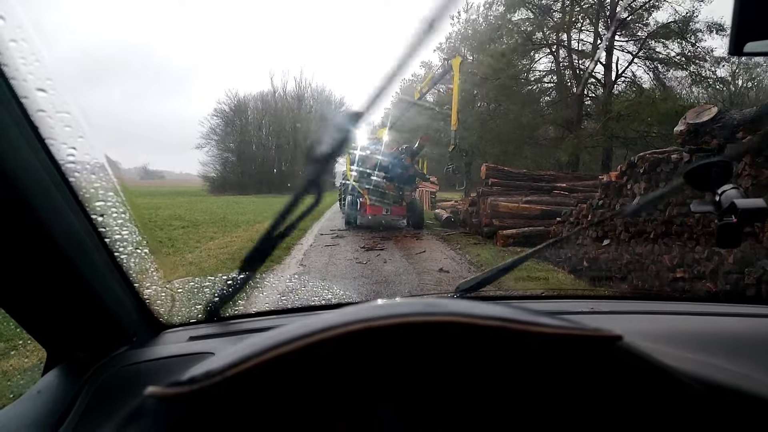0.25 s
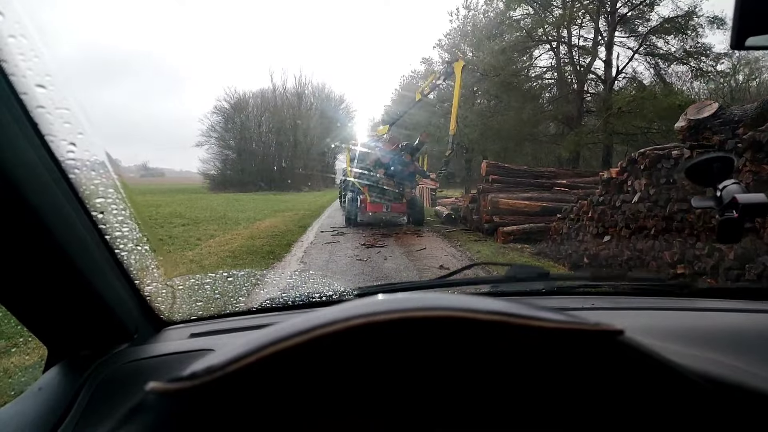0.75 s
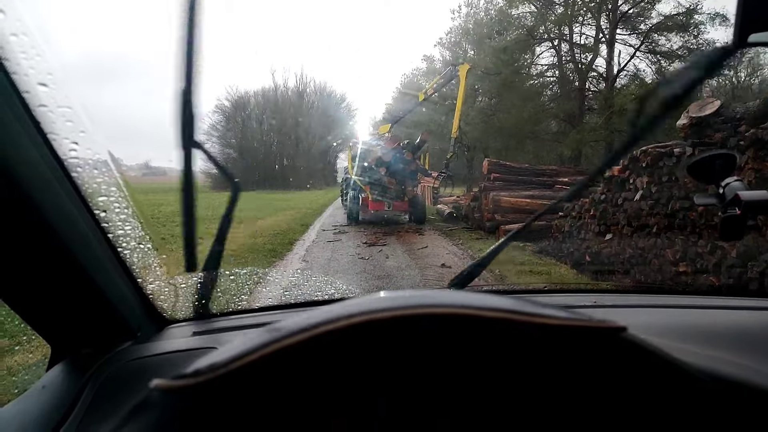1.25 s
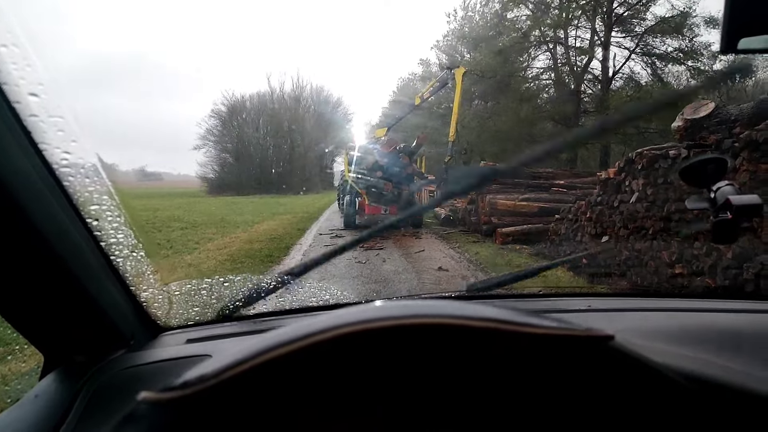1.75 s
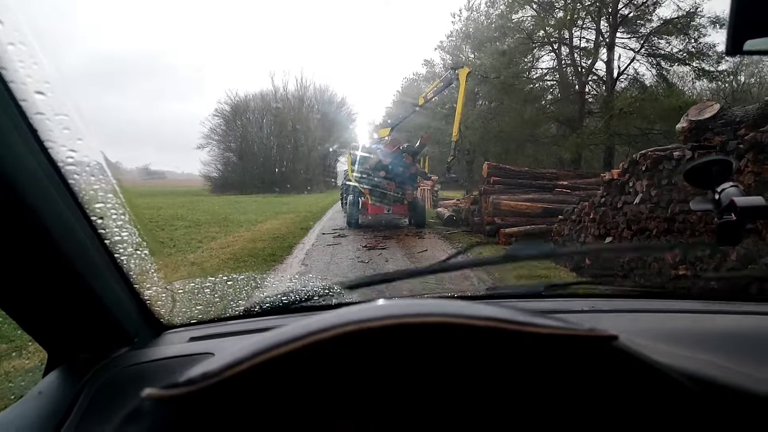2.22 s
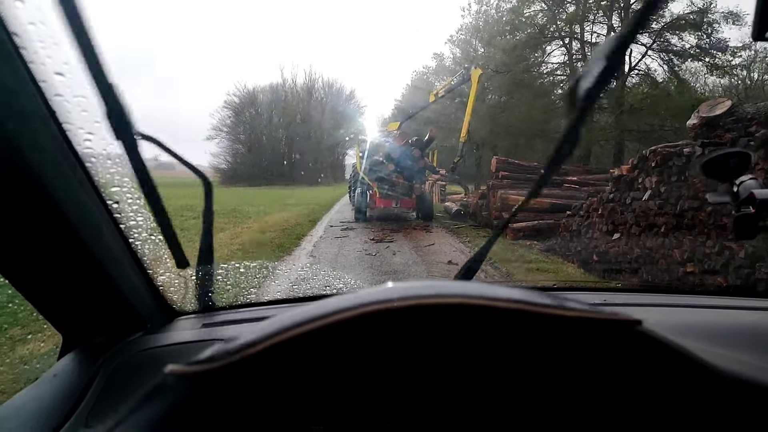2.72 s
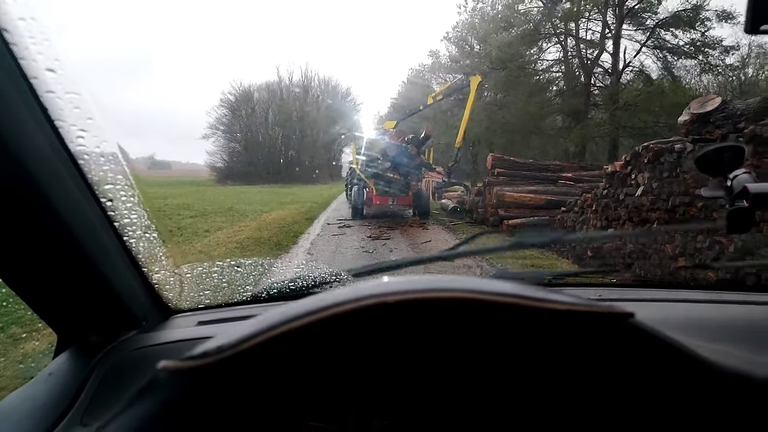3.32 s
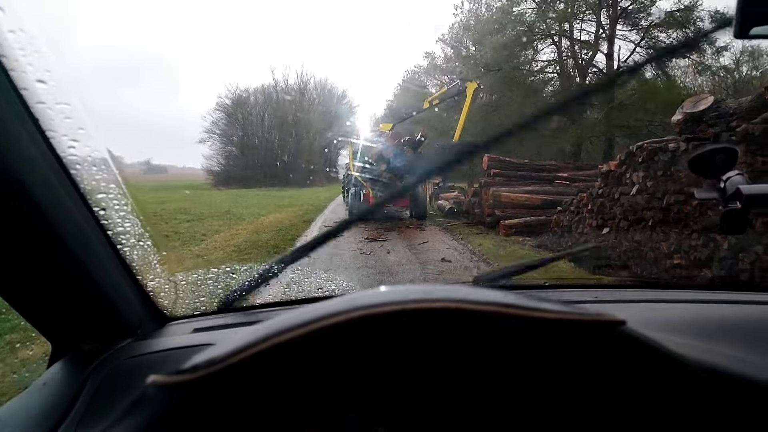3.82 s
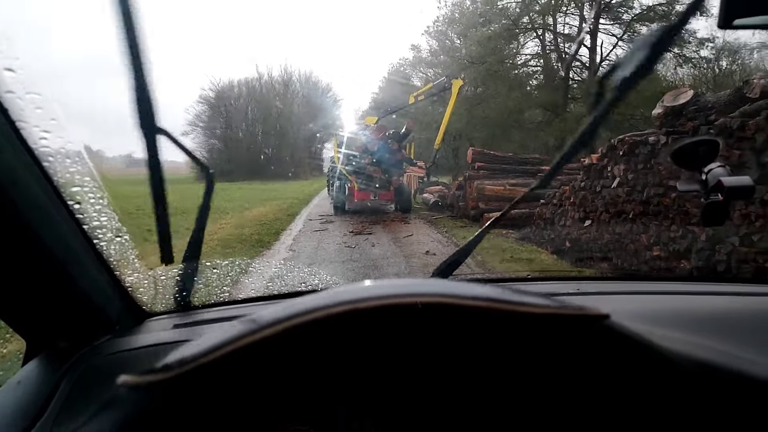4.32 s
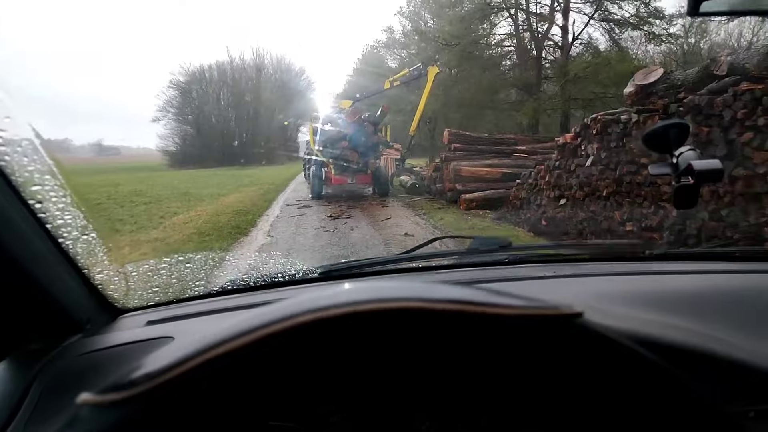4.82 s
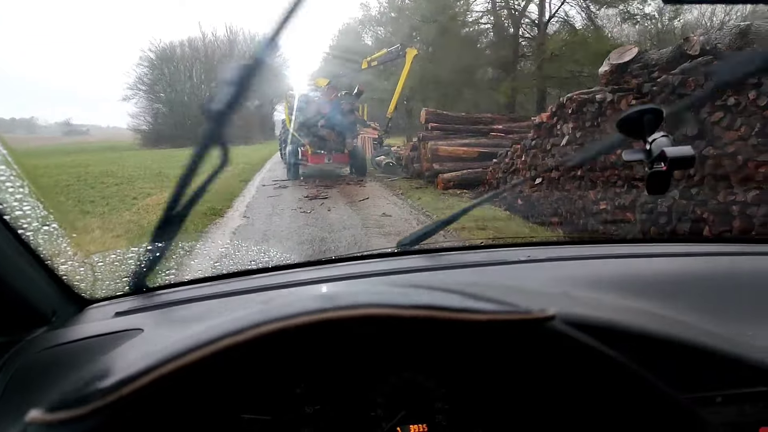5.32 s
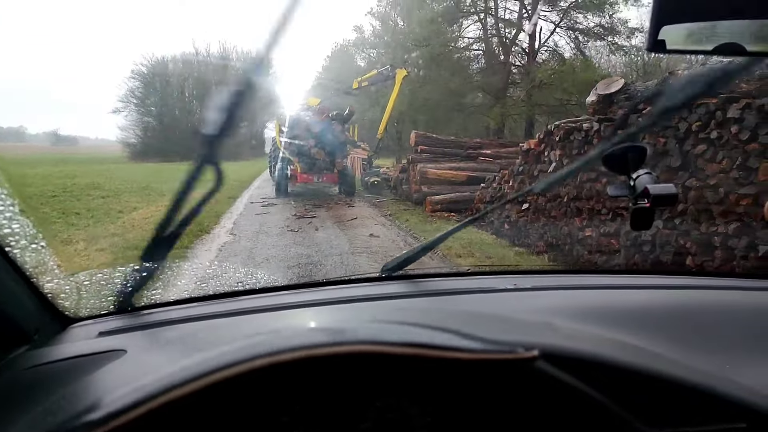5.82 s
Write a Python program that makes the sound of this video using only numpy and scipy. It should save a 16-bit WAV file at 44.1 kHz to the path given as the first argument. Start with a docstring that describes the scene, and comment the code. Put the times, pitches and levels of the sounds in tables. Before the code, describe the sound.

Rain patters on a parked car's windshield and drums on its roof while wipers thump back and forth over a low diesel rumble.

```python
"""Heavy rain on the roof and windshield of a parked car, heard from the cabin.
From the start a diesel rumbles in tones tied to its engine cycle, rain patters as bursts of coloured noise,
and ringing single drops stand out; rubber squeals, made of narrow noise, come at 0, 2.6 and 5.8 s.
All along, wipers thump at each end of the sweep by ringing the glass, and swish in noise on the way down.
From 2.2 s a low engine boom comes in, sags near 4.7 s and lets go; it is back at 5 s and fades to the end."""
import sys
import numpy as np
from scipy import signal
from scipy.fft import rfft, irfft, next_fast_len
from scipy.io import wavfile
from scipy.ndimage import uniform_filter1d

SR = 44100
rng = np.random.default_rng(int(sys.argv[2]) if len(sys.argv) > 2 else 0)


def to_wav(s):
    """Save 16-bit WAV."""
    ch = np.atleast_2d(s).T  # columns
    pcm = np.round(np.clip(ch, -1, 1) * 32767)  # PCM
    wavfile.write(sys.argv[1], SR, pcm.astype(np.int16))


N = 267246  # length in samples


def gain_of(db):
    """Turns decibels into an amplitude factor."""
    return 10 ** (np.asarray(db) / 20)


def evened(x):
    """Scales a sound to an rms of 1."""
    return x / np.sqrt(np.mean(x ** 2) + 1e-20)


def read(points, hz):
    """Reads a curve of (pitch, value) points, with straight lines over log pitch."""
    point_hz, value = np.transpose(points)
    return np.interp(np.log(hz + 1), np.log(point_hz + 1), value)


def add(mix, start_s, sound):
    """Adds a sound into the mix at its start time, cut off at the end of the mix."""
    part = mix[round(start_s * SR):][:len(sound)]
    part += sound[:len(part)]


def resonate(x, hz, width_hz):
    """Shifts hz, fixed or moving, down to zero, smooths, and shifts back: a resonance of gain 1."""
    turn = np.exp(2j * np.pi * np.cumsum(hz * np.ones(len(x))) / SR)
    keep = np.exp(-np.pi * width_hz / SR)
    smoothed = signal.lfilter([1 - keep], [1, -keep], x / turn)
    return 2 * (turn * smoothed).real


def steep(x, hz, width_hz):
    """A resonance passed twice, so that it falls off faster on both sides."""
    return resonate(resonate(x, hz, width_hz), hz, width_hz)


def wander(size):
    """A slow random curve of rms 1, smoothed twice over size samples."""
    once = uniform_filter1d(rng.standard_normal(N), size)
    return evened(uniform_filter1d(once, size))


CYCLE_HZ = 8.422  # engine cycles a second
# Multiples of the engine cycle that stand out: [multiple]
CYCLE_MULTIPLES = [2, 3, 5, 6, 7, 8, 9, 11, 12, 16, 20, 22, 24, 27, 28, 29, 31, 32, 33, 35, 36, 40, 42, 45,
                   46, 48, 52]
# How loud each of those multiples is: [level_db, rms]
MULTIPLE_LEVELS = [-51.5, -65, -46, -57, -57.5, -53, -59, -54, -51, -52.5, -61.5, -63.5, -64, -65.5, -61,
                   -68.5, -68.5, -68.5, -72, -68, -65, -63, -63.5, -66.5, -71.5, -65.5, -69.5]
# The firing boom comes in under load, then sags and lets go: [time_s, pitch_hz, level_db rms]
FIRING_BOOM = [(0, 33.5, -54), (1.95, 33.9, -57.5), (2.2, 34.54, -44.5), (3.4, 33.8, -42),
               (4.55, 33.79, -42), (4.7, 28.4, -38), (4.85, 27.4, -63), (5, 33.26, -44.5),
               (6.06, 33.7, -60)]
# Wavering hums apart from the engine: [pitch_hz, width_hz, level_db rms]
WAVERING_HUMS = [(157.95, 3.8, -52.5), (226.5, 0.52, -62), (710.2, 21, -75.5), (945, 40, -76.5),
                 (1150, 9.5, -77.5)]


def engine():
    """Multiples of the engine cycle, each swaying a little in level, plus the boom and the hums."""
    t = np.arange(N) / SR
    cycles = CYCLE_HZ * t + 0.00047 * wander(size=8000)  # a slightly uneven idle
    sways_db = [wander(size=5000) for _ in range(4)]
    tones = np.zeros(N)
    starts = rng.random(len(MULTIPLE_LEVELS))
    for multiple, level_db, start in zip(CYCLE_MULTIPLES, MULTIPLE_LEVELS, starts):
        loudness = gain_of(level_db + sways_db[multiple % 4])
        tones += loudness * np.sin(2 * np.pi * (multiple * cycles + start))
    time_s, pitch_hz, level_db = np.transpose(FIRING_BOOM)
    boom_turns = np.cumsum(np.interp(t, time_s, pitch_hz)) / SR
    boom = gain_of(np.interp(t, time_s, level_db)) * np.sin(2 * np.pi * boom_turns)
    hums = sum(gain_of(db) * evened(steep(rng.standard_normal(N), hz, width_hz))
               for hz, width_hz, db in WAVERING_HUMS)
    return np.sqrt(2) * (tones + boom) + hums  # a sine of peak sqrt(2) has an rms of 1


def falling(per_s, spread_db, tail_s):
    """Power of drops of random size and time, each a dying puff; mean 1."""
    sizes_db = spread_db * np.minimum(rng.exponential(1, N), 5)
    hits = gain_of(2 * sizes_db) * (rng.random(N) < per_s / SR)  # doubled, as power is amplitude squared
    power = signal.lfilter([1], [1, -np.exp(-2 / (tail_s * SR))], hits)
    return power / power.mean()


# How alike the left and right noise are, 1 being the same: [pitch_hz, likeness]
SIDE_LIKENESS = [(60, 0.79), (130, 1), (280, 0.65), (620, 0.64), (1350, 0.016), (2930, 0.059),
                 (6380, 0.019), (13900, 0.03)]


def drops_on(spectrum, power, patchy_db, size=512):
    """Noise of the given power on both sides, coloured by the struck surface in drifting patches; rms 1."""
    puffs = np.sqrt(power) * rng.standard_normal((2, N))
    overlap = size * 3 // 4
    hz, _, (left, other) = signal.stft(puffs, SR, nperseg=size, noverlap=overlap)
    same = np.clip(read(SIDE_LIKENESS, hz), -1, 1)[:, None]
    right = same * left + np.sqrt(1 - same ** 2) * other
    patches = uniform_filter1d(rng.standard_normal(left.shape), size=8, axis=0)  # smooth over pitch
    patches = uniform_filter1d(patches, size=16, axis=1)  # and over time
    colour_db = read(spectrum, hz)[:, None] + patchy_db * evened(patches)
    coloured = np.array([left, right]) * gain_of(colour_db)
    return evened(signal.istft(coloured, SR, nperseg=size, noverlap=overlap)[1][:, :N])


DRUM_DB = -46.5  # how hard the roof drums, rms before the flurries
# Colour of the drumming roof, relative levels: [pitch_hz, level_db per Hz]
ROOF_COLOUR = [(14, -36.5), (22, -10), (50, -6.5), (85, -6.5), (140, -3), (195, -11), (275, -19),
               (420, -23), (520, -22.5), (800, -28), (880, -33), (950, -36), (1200, -36), (1900, -59.5)]


def roof_drum(flurries_db):
    """Drops set the roof panel drumming: long puffs of low noise over a steady wash."""
    on_roof = falling(per_s=130, spread_db=3.5, tail_s=0.029)
    drumming = drops_on(ROOF_COLOUR, 3.9 + on_roof, patchy_db=0.6, size=2048)
    return gain_of(DRUM_DB + 0.6 * flurries_db) * drumming


def small_drops(per_s, level_db):
    """Many light taps, each a millisecond's ring of the glass at one of seven pitches, on one side."""
    out, t = np.zeros((2, N)), np.arange(400) / SR
    sizes = gain_of(2.8 * np.minimum(rng.exponential(1, N), 4)) * (rng.random(N) < per_s / SR)
    pitches = np.geomspace(1700, 3300, num=7)
    spot = rng.integers(0, 2 * len(pitches), N)  # a pitch and a side for each tap
    for k, hz in enumerate(np.tile(pitches, reps=2)):
        tap = np.sin(2 * np.pi * hz * t) * np.tanh(t / 0.0003) * np.exp(-t / 0.00081)
        out[k // len(pitches)] += signal.oaconvolve(sizes * (spot == k), tap)[:N]
    return gain_of(level_db) * evened(out)


# Strength of the rain, before the flurries: [time_s, patter_level_db, spray_level_db]
RAIN_STRENGTH = [(0, -66, -73.5), (.25, -63.5, -80.5), (.75, -62, -76.5), (.95, -65, -78),
                 (1.9, -60.5, -74), (2.5, -65, -78), (2.8, -62, -69), (3.1, -64, -79.5), (3.9, -63.5, -77),
                 (4.45, -61, -72.5), (4.65, -60, -68.5), (4.95, -60, -70), (5.1, -61, -70),
                 (5.381, -61.5, -72), (5.5, -61.5, -65), (5.66, -62, -72.5), (5.921, -60, -65),
                 (6.06, -59, -68.5)]
# Colour of the patter, relative levels: [pitch_hz, level_db per Hz]
PATTER_COLOUR = [(600, -10.5), (900, -1.5), (1150, -2), (1600, -4.5), (2000, -5), (2450, -3), (2800, -6),
                 (3200, -9), (4300, -13.5), (6000, -22.5), (9000, -39), (12000, -59)]
# Colour of the fine spray, relative levels: [pitch_hz, level_db per Hz]
SPRAY_COLOUR = [(2500, -43), (4500, -0.5), (6000, 2), (7500, -0.5), (9700, -8), (12000, -2.5),
                (13700, -8.5), (14300, 1)]


def rain_on_glass(flurries_db):
    """Drops burst on the glass as patter, with fine spray from the same drops and light taps."""
    t = np.arange(N) / SR
    time_s, *levels = np.transpose(RAIN_STRENGTH)
    patter_db, spray_db = (np.interp(t, time_s, level) for level in levels)
    on_glass = falling(per_s=300, spread_db=1.3, tail_s=0.0092)
    patter_noise = drops_on(PATTER_COLOUR, 0.74 + on_glass, patchy_db=1.52)
    patter = gain_of(patter_db + 0.66 * flurries_db) * patter_noise
    spray_noise = drops_on(SPRAY_COLOUR, 0.85 + on_glass, patchy_db=2.0)
    spray = gain_of(spray_db + 0.74 * flurries_db + 1.2 * wander(size=1500)) * spray_noise
    taps = gain_of(patter_db) * small_drops(per_s=900, level_db=-11)  # level against the patter
    return patter + spray + taps


def rain():
    """Rain on the roof and on the glass swells together in short flurries."""
    flurries_db = wander(size=1500)
    return roof_drum(flurries_db) + rain_on_glass(flurries_db)


# Large single drops; both levels are before fading: [start_s, ring_db, pitch_hz, splash_db]
LARGE_DROPS = [(0.268, -54, 2250, -79), (0.535, -54, 2700, -77), (0.722, -53.5, 2360, -75),
               (0.814, -56, 1440, -57), (1.0078, -46, 1450, -68), (1.375, -55, 2730, -70),
               (1.4381, -55, 2490, -81), (1.535, -50, 1450, -58), (1.9632, -58, 2430, -58),
               (2.067, -63, 2490, -63), (2.337, -64, 3270, -74), (2.587, -54, 2210, -54.5),
               (2.632, -52, 2430, -80), (2.6347, -56, 3227, -80), (2.6445, -58, 2600, -80),
               (2.831, -54, 2640, -72), (2.8588, -54, 2400, -72), (2.928, -59, 2250, -79),
               (2.987, -59, 3240, -67), (3.144, -59, 3300, -71), (3.3236, -55, 2370, -75),
               (3.522, -52, 1970, -80), (3.594, -56, 2350, -80), (3.6723, -53.5, 2580, -72),
               (3.856, -54.5, 1990, -72), (3.8838, -54, 1380, -62), (3.919, -55.5, 2460, -63),
               (4.1204, -55, 2230, -59), (4.2695, -61, 2230, -60), (4.316, -50.5, 2290, -78),
               (4.562, -53, 2780, -60), (4.655, -50, 2600, -68), (4.6834, -68, 1680, -52),
               (4.794, -48, 2330, -57), (4.9153, -51, 2310, -72), (4.9395, -64, 1750, -52.5),
               (5.0729, -53, 2445, -73), (5.2686, -49.5, 2107, -71), (5.4063, -56, 1390, -83),
               (5.54, -52, 3040, -59), (5.61, -52, 2590, -72), (5.68, -53, 2880, -72),
               (5.712, -50, 2290, -76), (6.0193, -55, 3250, -74)]


def big_drops():
    """A short ring of the glass with a crisp wide splash, smeared differently on each side."""
    out, t = np.zeros((2, N)), np.arange(900) / SR
    noises = rng.standard_normal((len(LARGE_DROPS), 2, len(t)))
    for (start_s, ring_db, hz, splash_db), noise in zip(LARGE_DROPS, noises):
        tones = np.sin(2 * np.pi * hz * t) + 0.23 * np.sin(2 * np.pi * 1.65 * hz * t)
        clear = tones * np.tanh(t / 0.00036) * np.exp(-t / 0.0019)
        for side, puff in zip(out, noise):
            smear = evened(steep(puff, hz, 0.73 * hz)) * np.exp(-t / 0.0088)
            ring = 0.5 * smear + 0.98 * clear
            splash = resonate(puff, 3600, 4500) * np.tanh(t / 0.00079) * np.exp(-t / 0.0048)
            add(side, start_s, gain_of(ring_db) * ring + gain_of(splash_db) * splash)
    return out


WAVER_HZ, FLUTTER_DB = 22, 1  # how far a squeal strays in pitch and level, rms
# Faint squeals of rubber on wet glass: [start_s, length_s, pitch_hz, width_hz, level_db]
RUBBER_SQUEALS = [(0, 0.19, 4300, 190, -78), (0, 0.11, 3430, 170, -75), (2.626, 0.44, 4350, 190, -78.5),
                  (2.637, 0.28, 3550, 160, -76), (5.82, 0.44, 3180, 700, -68.5)]


def squeals():
    """Fuzzy narrow bands of noise that waver, flutter and fade."""
    out = np.zeros((2, N))
    for start_s, length_s, hz, width_hz, level_db in RUBBER_SQUEALS:
        swell = signal.windows.tukey(round(length_s * SR), .45)
        stray, flutter = (wander(size=1200)[:len(swell)] for _ in range(2))
        loudness = gain_of(level_db + FLUTTER_DB * flutter) * swell
        for side in out:
            noise = rng.standard_normal(len(swell))
            band = evened(steep(noise, hz + WAVER_HZ * stray, width_hz))
            add(side, start_s, loudness * band)
    return out


SWEEP_S, MID_DOWN_S = 1.412, 0.438  # a full sweep down and up, and the middle of the first down stroke
SWISH_S, SWISH_DB = 0.097, -66  # half length and level at the middle
# Colour of rubber on wet glass, relative levels: [pitch_hz, level_db per Hz]
SWISH_COLOUR = [(1200, -32), (2000, -9.5), (2450, 0.5), (2900, -7.5), (3500, -10), (5000, -30)]


def swish():
    """The blades rub over wet glass: noise that swells around the middle of every down stroke."""
    t = np.arange(N) / SR
    from_mid_s = (t - MID_DOWN_S + SWEEP_S / 2) % SWEEP_S - SWEEP_S / 2
    swell = np.exp(-(from_mid_s / SWISH_S) ** 2)
    return gain_of(SWISH_DB) * swell * drops_on(SWISH_COLOUR, 1, patchy_db=0.5)


JUDDER_DB = -21  # against the thump, before the judder's own swell
BOUNCE_S, BOUNCE = .011, 0.43  # the arm strikes again about this long after, at this share of the blow
# Wiper thumps; levels are peaks before the dashboard dulls them:
# [start_s, kind of turn, pitch_hz of the glass that answers, thump_db, shove_s, cowl_db, knock_delay_s, knock_db]
WIPER_THUMPS = [(0.028, "top first", 145, -37.5, .1, -41.5, 0.018, -67),
                (.111, "top second", 123, -26.5, 0.066, -41.5, .018, -41.5),
                (.712, "jolt", 155, -36, .02, -55, 0.0055, -62),
                (.731, "foot first", 140, -31, 0.034, -38.5, .001, -40),
                (.801, "foot second", 138, -28.5, 0.11, -40.5, 0.00096, -43.5),
                (1.396, "jolt", 142, -34.5, 0.042, -47, .005, -66),
                (1.434, "top first", 157, -32.5, 0.061, -36.5, 0.0051, -57),
                (1.509, "top second", 120, -25, 0.089, -36.5, 0.015, -54),
                (2.119, "foot first", 161, -30, 0.065, -36.5, .008, -42.5),
                (2.198, "foot second", 149, -30.5, 0.047, -37, 0.0011, -46),
                (2.827, "top first", 131.5, -25, 0.022, -44, .016, -55),
                (2.915, "top second", 107, -26, 0.024, -36.5, .019, -50),
                (3.007, "jolt", 141, -36, .03, -47, .005, -70),
                (3.135, "jolt", 140, -34.5, 0.019, -55, .005, -63),
                (3.388, "jolt", 145, -29.5, 0.017, -51, .005, -53),
                (3.423, "jolt", 142, -34.5, 0.02, -52, .005, -60),
                (3.516, "foot first", 154.4, -31.5, 0.063, -38.5, .003, -43.5),
                (3.588, "foot second", 161, -32, 0.06, -36.5, 0.019, -47),
                (4.217, "top first", 135, -27.5, 0.045, -45, 0.016, -63),
                (4.298, "top second", 112.6, -25.5, 0.065, -37.5, 0.017, -45.5),
                (4.68, "jolt", 148, -35, 0.033, -52, .005, -58),
                (4.909, "foot first", 160, -28.5, 0.05, -35.5, 0.0019, -45),
                (4.977, "foot second", 139.4, -31, 0.07, -37.5, 0.01, -46),
                (5.613, "top first", 151, -30.5, 0.026, -39, .008, -58),
                (5.71, "top second", 119, -27, 0.045, -35, .008, -48)]
# How fast each kind of turn builds up: {kind of turn: rise_s}
TURN_RISES = {"top first": 0.0055, "top second": 0.011, "foot first": 0.0036, "foot second": 0.0059, "jolt":
              0.011}
# Ringing modes of the glass: [pitch_hz, level_db, time_to_fade_60_db_s]
GLASS_MODES = [(100.4, -1, 0.16), (107.4, 0.5, 0.2), (120, 5.5, 0.26), (138.3, 10.5, 0.17),
               (158.6, 5, 0.43), (171, 1.5, 0.27), (194, -1, 0.21)]
# Resonances of the wiper arm, relative levels: [pitch_hz, width_hz, level_db]
ARM_RESONANCES = [(571, 71, -5.5), (700, 96, 9), (916, 70, -0.5), (1150, 120, -8.5)]
# Resonances of the cowl, the panel under the pivots, relative levels: [pitch_hz, width_hz, level_db]
COWL_RESONANCES = [(218.6, 28, 6.5), (279, 41, -1), (349, 45, 1), (473, 21, -10)]


def struck(part, blows):
    """A metal part answers blows with its resonances."""
    return sum(gain_of(db) * resonate(blows, hz, width_hz) / np.sqrt(width_hz) for hz, width_hz, db in part)


def wipers():
    """The rubber flips over in a soft shove: the nearest glass modes ring, the arm knocks and chatters."""
    out, t = np.zeros(N), np.arange(9000) / SR
    noises = rng.standard_normal((len(WIPER_THUMPS), len(t)))
    for thump_row, noise in zip(WIPER_THUMPS, noises):
        start_s, kind, hz, thump_db, shove_s, cowl_db, delay_s, knock_db = thump_row
        modes = np.zeros(len(t))
        for mode_hz, mode_db, fade_s in GLASS_MODES:
            missed_db = 10.7 * ((mode_hz - hz) / 18) ** 2  # modes far from the pitch answer less
            modes += gain_of(mode_db - 60 * t / fade_s - missed_db) * np.sin(2 * np.pi * mode_hz * t)
        # growing while the blade presses, then a weak ring
        pressed = 0.3 + (1 + 0.8 * t / shove_s) * np.exp(-(t / shove_s) ** 3)
        thump = modes * pressed * (1 - np.exp(-(t / TURN_RISES[kind]) ** 2))

        chatter = 0.82 * noise * np.exp(-t / 0.023) + 22 * (t == 0)  # faint rattling and one sharp blow
        add(chatter, BOUNCE_S * (1 + .15 * noise[0]), [22 * BOUNCE])
        knock = struck(ARM_RESONANCES, chatter) * np.tanh(t / 0.00095)
        cowl = struck(COWL_RESONANCES, chatter) * np.tanh(t / 0.0085)

        # the body shakes longer, from just before the thump
        judder = evened(steep(noise[::-1], 119.6, 131)) * t / 0.021 * np.exp(1 - t / 0.046)
        add(out, start_s, gain_of(thump_db) * thump / abs(thump).max())
        add(out, start_s, gain_of(cowl_db) * cowl / abs(cowl).max())
        add(out, max(start_s - .03, 0), gain_of(thump_db + JUDDER_DB) * judder)
        add(out, start_s + delay_s, gain_of(knock_db) * knock / abs(knock).max())
    return out


DASH_HZ = 1300  # the dashboard passes wiper knocks below this


def scene():
    """Joins engine and wipers, carried by the car body, with the rain, drops, squeals and swish."""
    dashboard = signal.butter(6, DASH_HZ, fs=SR, output="sos")
    body = engine() + signal.sosfilt(dashboard, wipers())
    # body sound reaches the right side later and duller
    far_side = signal.lfilter([.12], [1, -.88], body)
    return rain() + big_drops() + squeals() + swish() + np.array([body, far_side])


EDGE_HZ = 14250  # nothing much is heard above this
# How much stronger the left side is than the right: [pitch_hz, difference_db]
LEFT_OVER_RIGHT = [(60, 0.6), (200, 0.9), (400, 0), (740, -1.5), (1200, -3.5), (2600, -7.5), (4000, -9),
                   (6000, -3.5), (7400, 0.5), (8500, 6.5), (9800, -1), (12000, -2.5), (14000, -1.5)]


def record(dry):
    """Colours the two sides differently, half the difference each, then cuts the top of the treble."""
    size = next_fast_len(N)
    half_db = read(LEFT_OVER_RIGHT, np.fft.rfftfreq(size, 1 / SR)) / 2
    sides = irfft(rfft(dry, size) * gain_of([half_db, -half_db]), size)[:, :N]
    band_limit = signal.firwin(1023, EDGE_HZ, window=("kaiser", 9), fs=SR)
    return signal.oaconvolve(sides, band_limit[None], "same")


dry = scene()
out = record(dry)
to_wav(out)
```